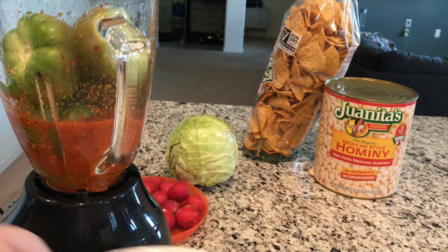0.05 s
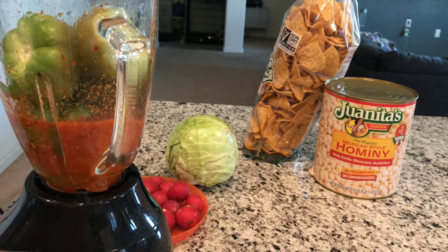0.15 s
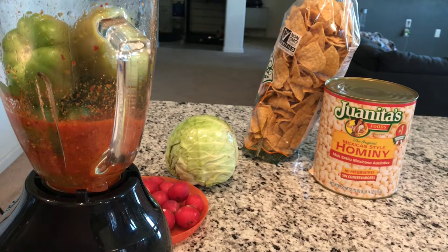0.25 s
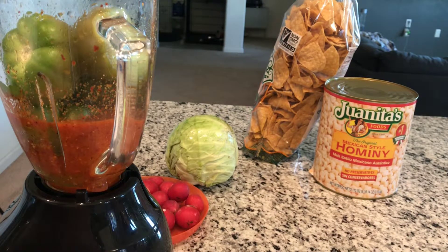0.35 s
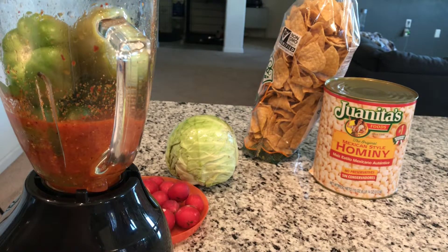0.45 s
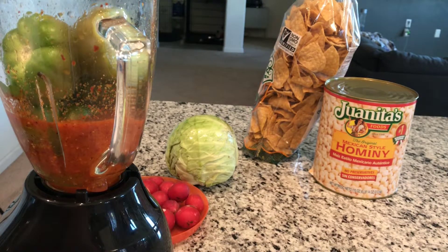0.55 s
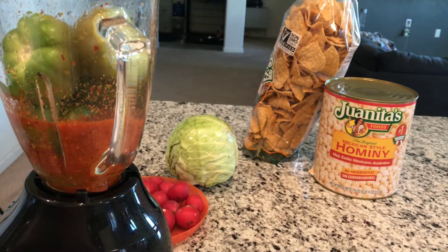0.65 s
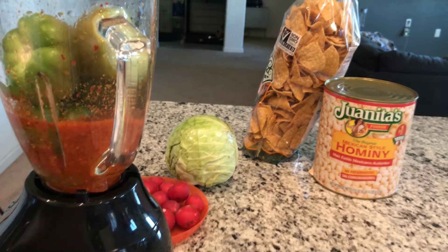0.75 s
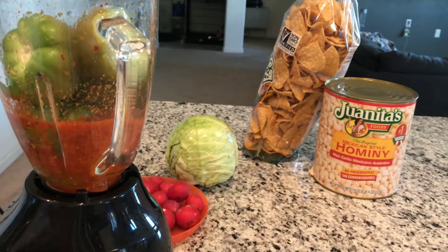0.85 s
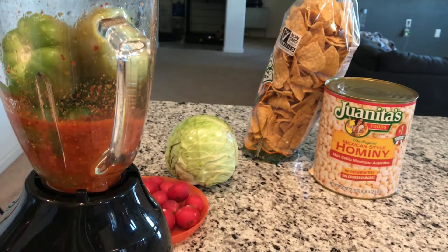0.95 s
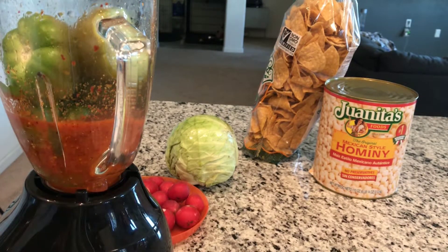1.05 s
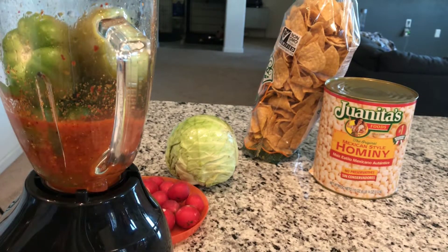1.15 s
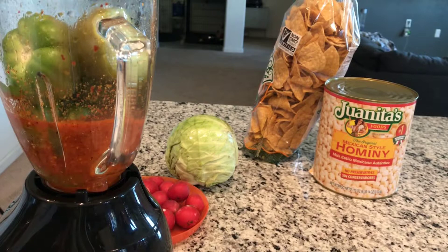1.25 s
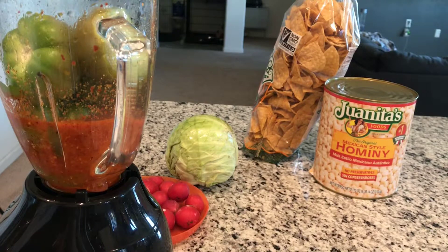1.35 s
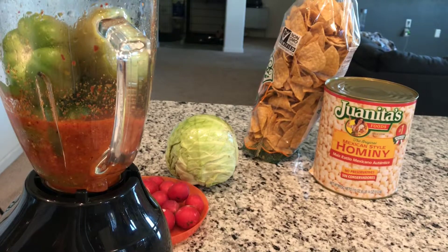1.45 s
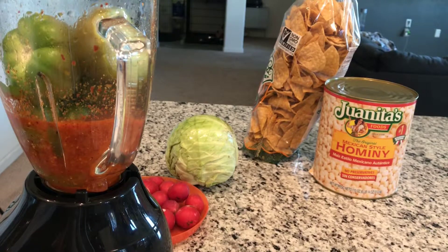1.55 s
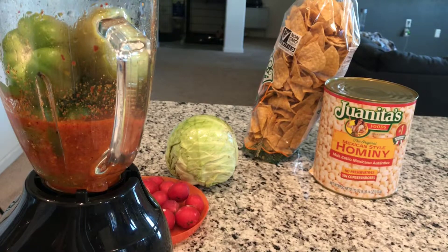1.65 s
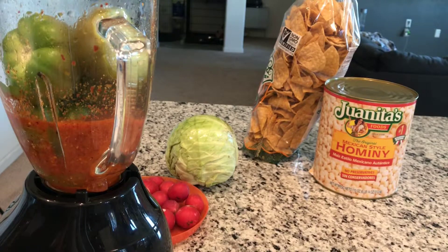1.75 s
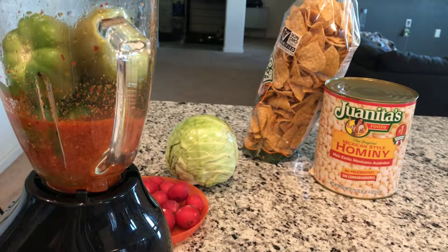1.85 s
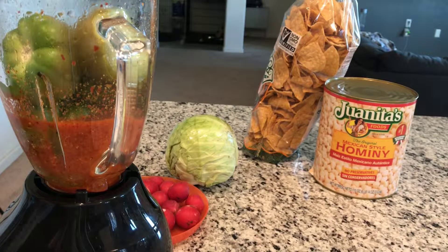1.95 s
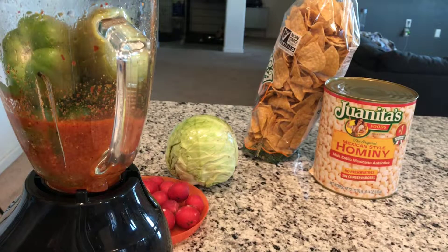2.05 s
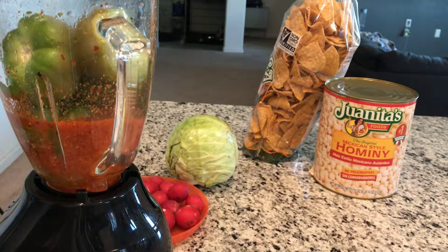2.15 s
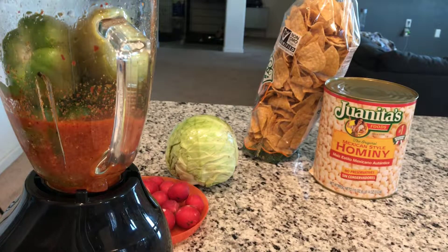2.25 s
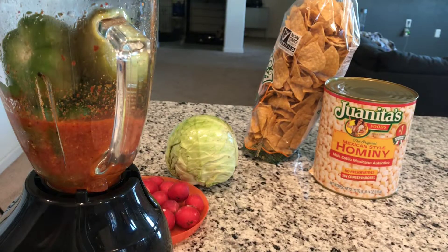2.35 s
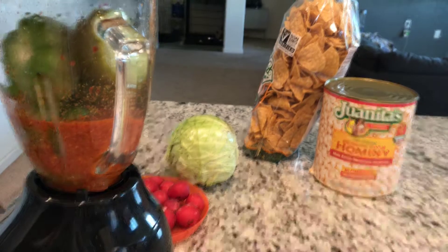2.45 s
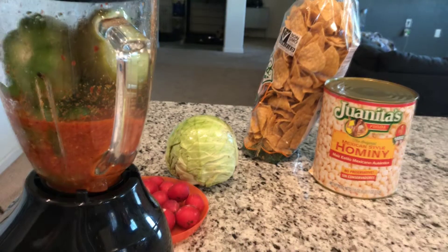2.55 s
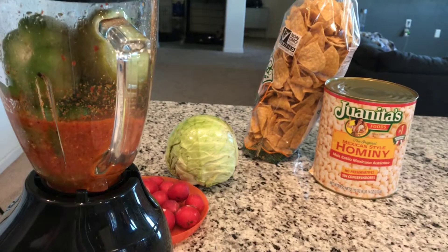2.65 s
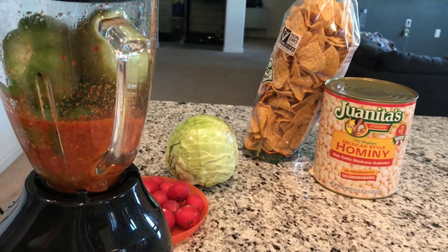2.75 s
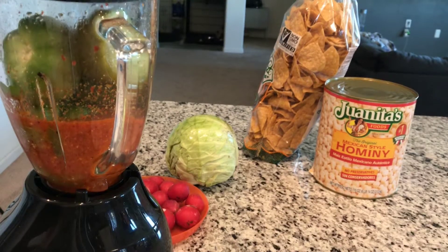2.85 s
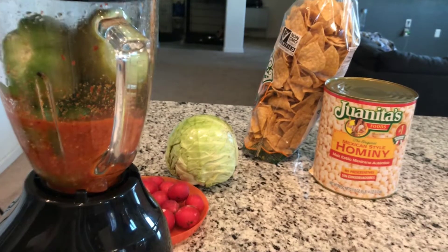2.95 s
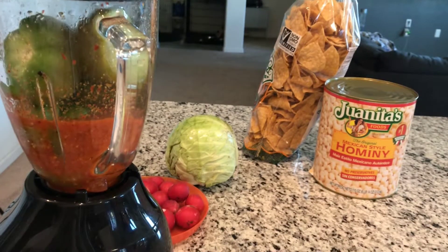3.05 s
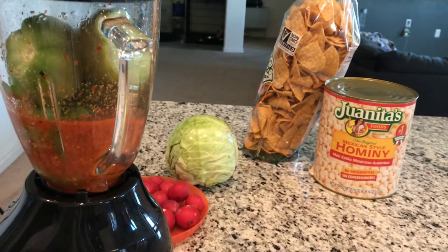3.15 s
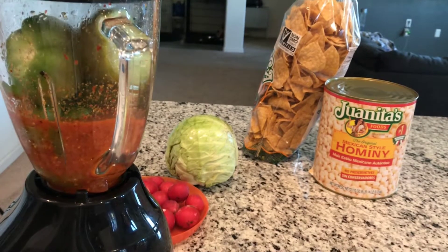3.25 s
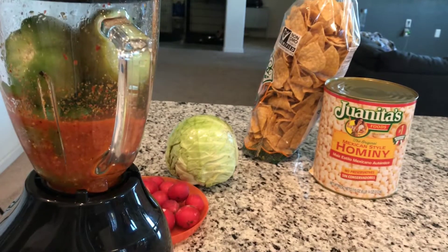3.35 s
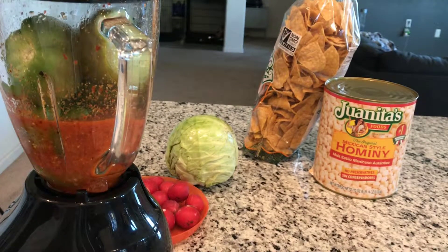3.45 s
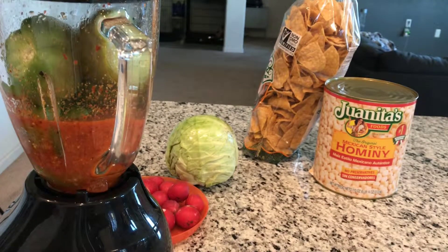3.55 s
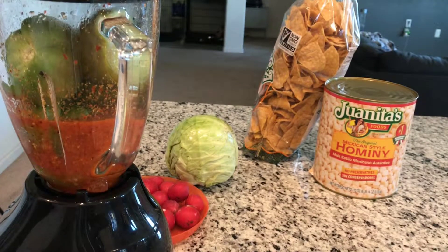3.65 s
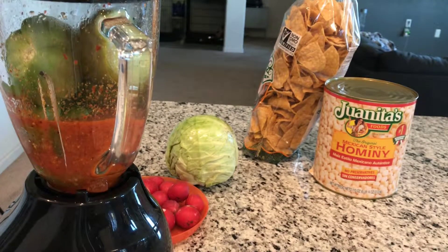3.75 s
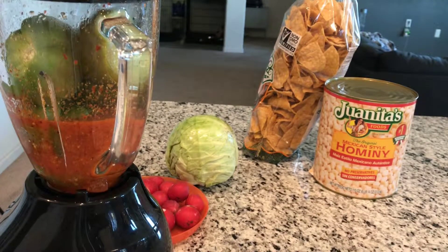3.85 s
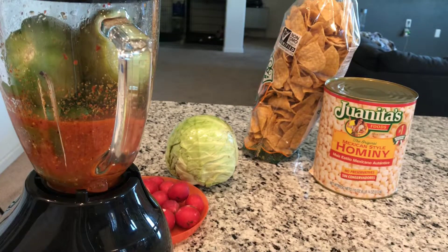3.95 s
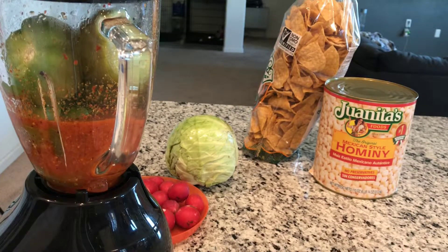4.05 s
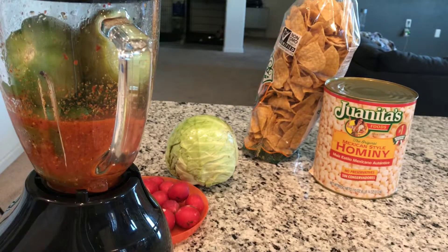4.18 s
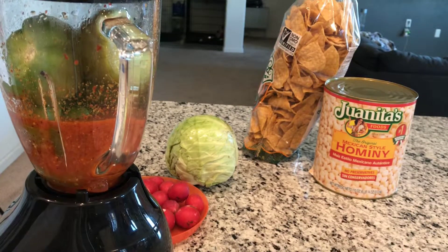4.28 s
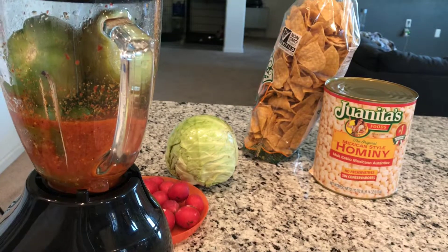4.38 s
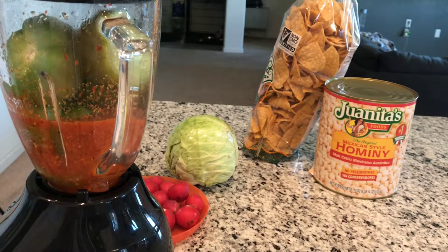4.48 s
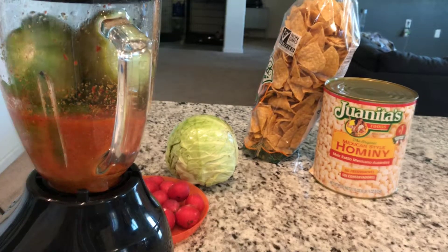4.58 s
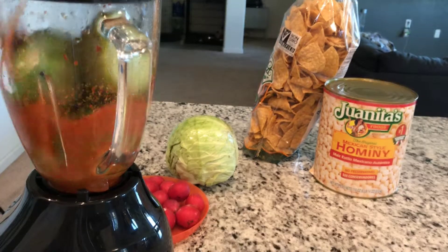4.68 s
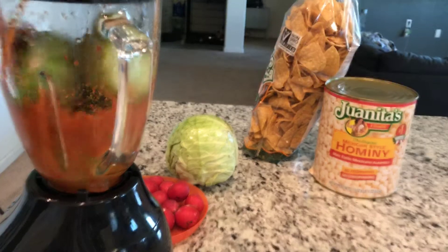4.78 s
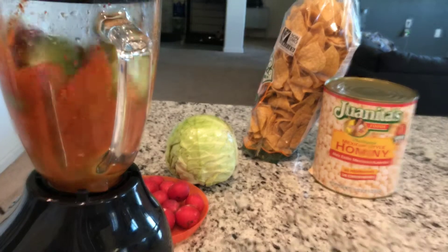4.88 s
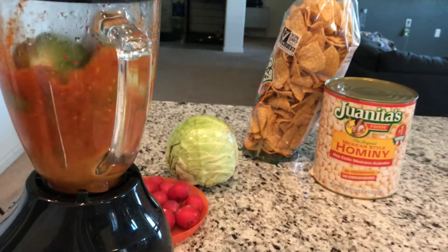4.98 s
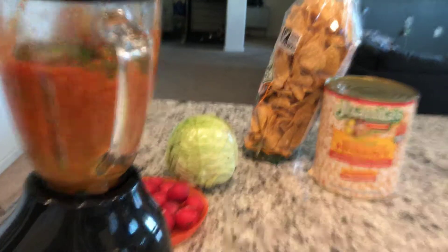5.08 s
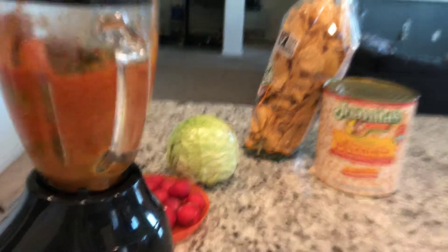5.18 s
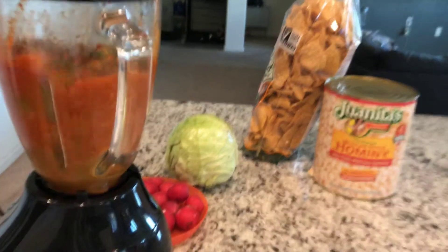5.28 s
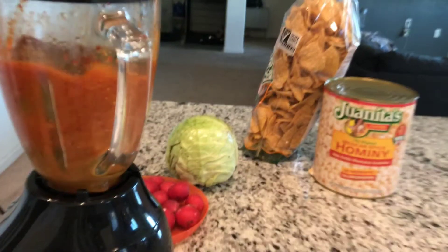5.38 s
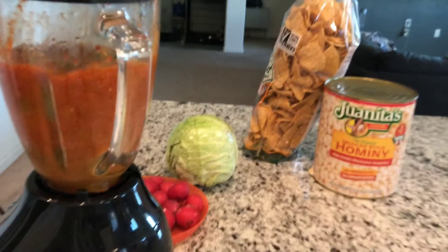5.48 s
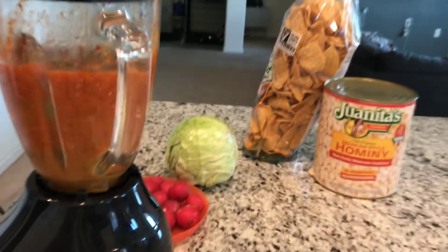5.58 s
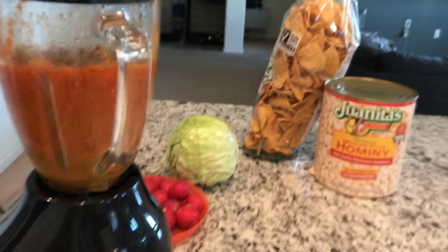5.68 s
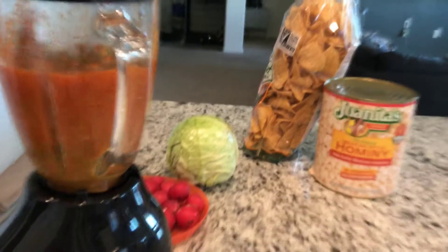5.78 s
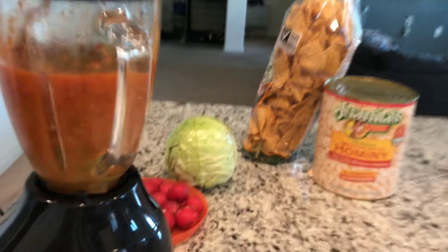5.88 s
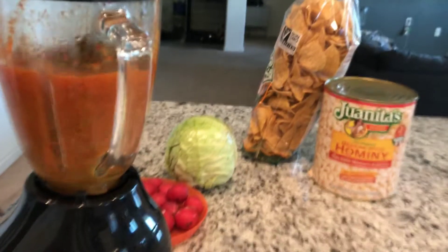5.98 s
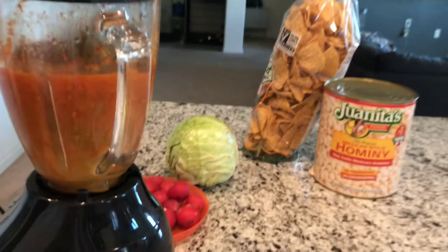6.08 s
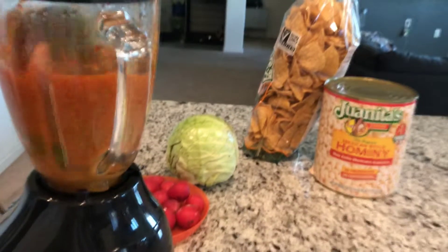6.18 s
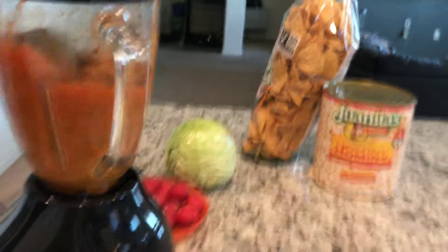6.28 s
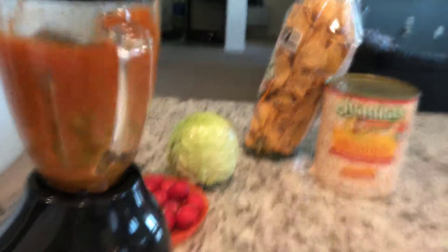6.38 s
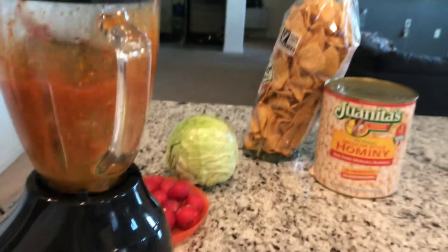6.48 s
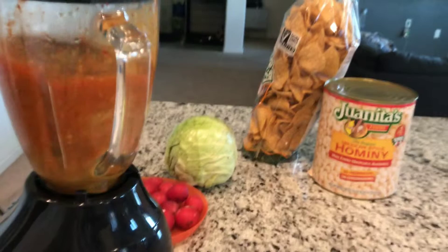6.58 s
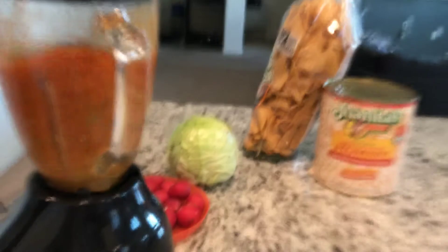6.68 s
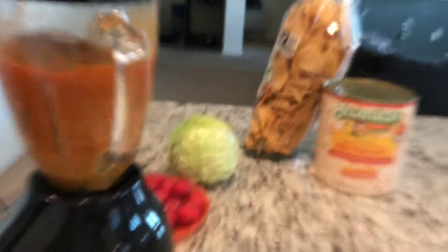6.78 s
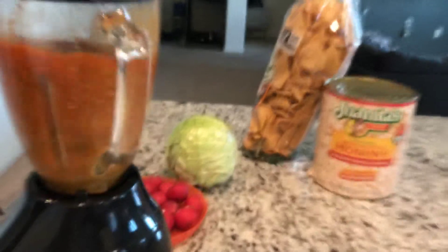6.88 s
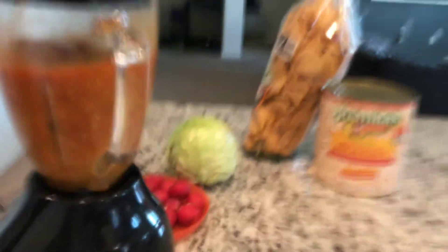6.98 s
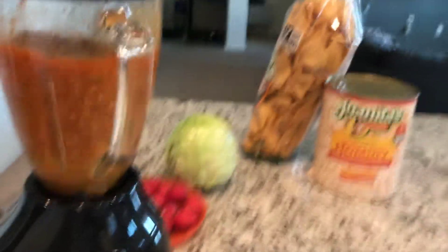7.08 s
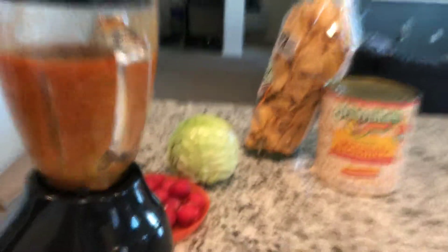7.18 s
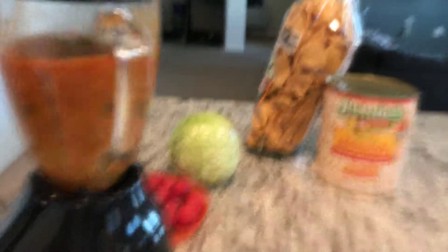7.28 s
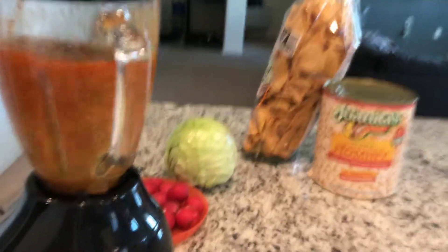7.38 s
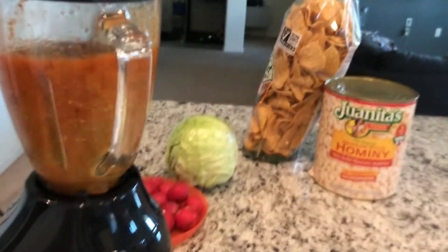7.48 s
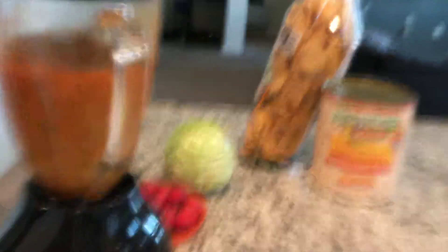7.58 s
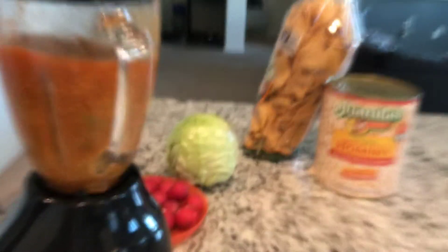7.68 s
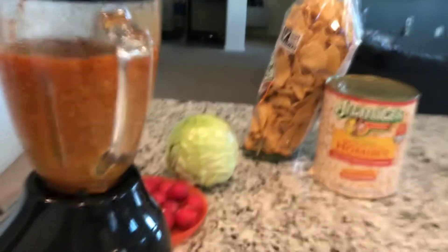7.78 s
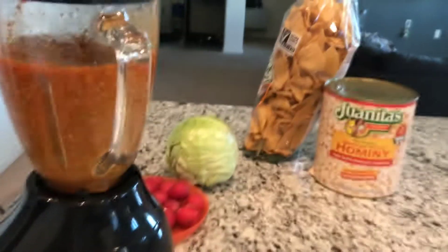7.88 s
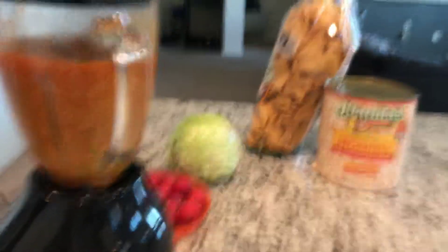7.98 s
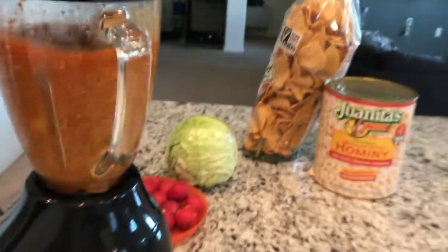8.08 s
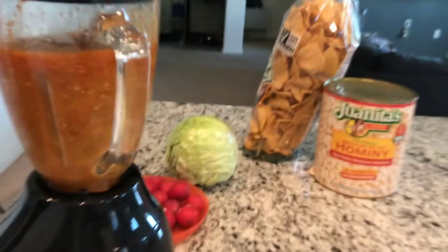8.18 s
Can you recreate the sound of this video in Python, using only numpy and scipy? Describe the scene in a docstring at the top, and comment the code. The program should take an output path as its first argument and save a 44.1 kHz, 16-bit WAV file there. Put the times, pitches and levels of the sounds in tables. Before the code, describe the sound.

In a small, lightly echoing home kitchen, a bowl and then a plate clatter onto a stone counter, a spoon scrapes and drops, and a lid is pressed on with a dull knock. Faint taps follow. A switch snaps and a blender growls into thick vegetables, loses its bite briefly, then speeds up into a wet, dense roar with pieces knocking the jar. The microphone is close by.

```python
"""A blender hums under a heavy load: its blades chop vegetables into sauce, slip briefly in an air pocket,
then gather speed as the mix thins and swirls up the jar. Dense random clicks and bubbles ring the jar.
Before that a bowl and a plate clatter on a stone kitchen counter, a spoon is put down, a lid is pressed on
and a switch snaps: short blows that ring each thing's resonances. A noise tail adds the kitchen's echo."""
import sys
import numpy as np
from scipy import signal
from scipy.fft import rfft, irfft, next_fast_len
from scipy.io import wavfile
from scipy.ndimage import uniform_filter1d

SR = 44100
rng = np.random.default_rng(int(sys.argv[2]) if len(sys.argv) > 2 else 0)


def inscribe(sig):
    """Save sig as 16-bit PCM at rate SR to the path in sys.argv[1].

    A 1-D sig is mono; a 2-D sig holds one channel per row.
    Samples are clipped to [-1, 1] before scaling.
    """
    pcm = np.round(np.clip(np.atleast_2d(sig).T, -1, 1) * 32767)
    wavfile.write(sys.argv[1], SR, pcm.astype(np.int16))


N = 362943
TIME = np.arange(N) / SR


def from_db(db):
    """Turn decibels into gain."""
    return 10 ** (np.asarray(db) / 20)


def rms_one(x):
    """Scale a sound to an average power of 1."""
    return x / np.sqrt(np.mean(x ** 2) + 1e-20)


def in_time(rows):
    """Draw each column of a table as a curve, sample by sample."""
    s, *columns = np.transpose(rows)
    return [np.interp(TIME, s, column) for column in columns]


def at_hz(points, hz):
    """Read a table between its points, along a log-frequency axis."""
    table_hz, values = np.array(points).T
    return np.interp(np.log(hz + 1), np.log(table_hz), values)


def add(out, s, sound):
    """Mix a short sound in at time s."""
    i = int(s * SR)
    out[i:i + len(sound)] += sound[:N - i]


def cut(x, hz, kind, order=2):
    """Keep one range of pitches with a Butterworth filter."""
    return signal.sosfilt(signal.butter(order, hz, kind, fs=SR, output="sos"), x)


def registers(x):
    """Split a sound into low, middle (sign flipped) and high parts."""
    thud_hz, crack_hz = 450, 3000
    return cut(x, thud_hz, "low"), -cut(x, [thud_hz, crack_hz], "band"), cut(x, crack_hz, "high")


def resonate(x, hz, width):
    """Ring one resonance with gain 1 at its peak; a narrower one rings longer."""
    r = np.exp(-np.pi * width / SR)
    feed = np.array([1, 0, -1]) * (1 - r * r) / 2
    feedback = [1, -2 * r * np.cos(2 * np.pi * hz / SR), r * r]
    return signal.lfilter(feed, feedback, x + 1e-18)


def colour(x, spectrum, peaks=()):
    """Shape a sound by a broad spectrum with resonances on it, without smearing it backward in time."""
    size = next_fast_len(len(x) + SR // 10) * 2
    hz = np.arange(size // 2 + 1) * SR / size
    db = at_hz(spectrum, hz) + sum(d / (1 + (2 * (hz - f) / w) ** 2) for f, w, d in peaks)
    # folding the cepstrum forward gives a minimum-phase filter
    cepstrum = irfft(np.log(from_db(db)))[:size // 2]
    cepstrum[1:] *= 2
    return irfft(rfft(x, size) * np.exp(rfft(cepstrum, size)))[:len(x)]


def drift(rate):
    """Wander randomly with a spread of 1, by straight lines between `rate` chance points per second."""
    knots = rng.standard_normal(N // 20)
    return np.interp(TIME * rate, np.arange(len(knots)), knots) * np.sqrt(3 / 2)


def grains(per_s, spread_db):
    """Scatter random clicks of uneven size and either sign."""
    sizes = from_db(spread_db * np.minimum(rng.exponential(1, N), 5)) * rng.choice([-1, 1], N)
    return rms_one(sizes * (rng.random(N) < per_s / SR))


def steady(x):
    """Even out slow swells, keeping the grain."""
    return x / np.sqrt(np.abs(uniform_filter1d(x ** 2, size=5000)) + 1e-12)


# how long the kitchen's echo takes to fall by 60 dB: f/Hz, fall time/s
ECHO_TIMES = [(100, 0.87), (300, 0.54), (1000, 0.49), (4500, 0.47), (14000, 0.44)]


def kitchen(x, wet_db, dull_hz):
    """Add the echo to the direct sound: a noise tail that dies away at its own pace in each band."""
    t, tail = TIME[:SR * 3 // 4], 0
    edges = np.geomspace(40, 18000, 10)
    for low, high in zip(edges, edges[1:]):
        t60 = at_hz(ECHO_TIMES, np.sqrt(low * high))
        band = cut(rng.standard_normal(len(t)), [low, high], "band")
        tail = tail + band * from_db(-60 * t / t60)
    build_up = 1 - np.exp(-t / 0.0017)
    tail = rms_one(tail * build_up) / np.sqrt(len(t))
    tail = cut(tail, dull_hz, "low", order=1)
    return x + from_db(wet_db) * signal.fftconvolve(x, tail)[:N]


def blows(hits, modes, contact_s, scatter_db, rattle_db, crack_db, bright_hz, gain_db):
    """Each blow rings the modes and gives a short crack; the hits set thud, body and crack levels."""
    rattle_s = 0.019   # how quickly a struck thing's rattling on its support dies away
    out, t = np.zeros(N), TIME[:SR // 4]
    for s, *levels_db in hits:
        # the contact is one click and a brief chatter, then loose parts rattle on
        contact = np.exp(-t / contact_s) / np.sqrt(contact_s * SR / 2)
        chatter, crack = rng.standard_normal((2, len(t))) * contact
        touches = rng.standard_normal(len(t)) * (rng.random(len(t)) < 700 / SR)
        rattle = from_db(rattle_db) * touches * np.exp(-t / rattle_s)
        force = (t == 0) + from_db(scatter_db) * chatter + rattle
        sound = from_db(crack_db) * cut(crack + rattle, bright_hz, "low", order=1)
        for k, (hz, width, db) in enumerate(modes):
            uneven_db = db + rng.normal(0, 0.65)   # no two blows ring quite alike
            sound = sound + (-1) ** k * from_db(uneven_db) * resonate(force, hz, width)
        for part, db in zip(registers(sound), levels_db):
            add(out, s, part * from_db(db + gain_db) / np.std(part[t < .014]))
    return out


def by_force(hits, thud_db, snap_db):
    """Spread each blow's level over thud, body and crack; a weaker blow is duller."""
    dulling = 0.53   # extra dB of crack lost for each dB that a blow is weaker
    hardest = max(db for s, db in hits)
    return [(s, db + thud_db, db, db + snap_db + dulling * (db - hardest)) for s, db in hits]


# colour of the quiet room: f/Hz, level/dB (per Hz, before scaling)
ROOM_TONE = [(18, -48), (30, -23), (53, -12), (174, -8.5), (449, -20.5), (616, -20.5), (1220, -24.5),
             (1390, -23.5), (16000, -37.5)]


def room_tone():
    """Steady background air: noise shaped by the room's colour."""
    return from_db(-69.5) * rms_one(colour(rng.standard_normal(N), ROOM_TONE))


# the bowl lands and bounces: t/s, level/dB (before gain)
BOWL_HITS = [(0.456, -24), (0.5285, -24), (0.5575, -27.5), (0.5745, -31.5), (0.587, -33.5)]
# what the bowl rings with: f/Hz, width/Hz, level/dB
BOWL_MODES = [(140, 25, -20), (269, 57, -15), (760, 130, -6), (874, 130, -4), (1323, 80, -9.5),
              (2230, 50, -7), (2372, 43, -0.5), (3830, 95, -19), (4620, 90, -9), (5950, 74, -19.5),
              (7050, 90, -18.5)]


def bowl():
    """The bowl lands on the stone and bounces, ringing its resonances."""
    return blows(by_force(BOWL_HITS, thud_db=-10, snap_db=-7.5), BOWL_MODES, contact_s=0.0031,
                 scatter_db=-14.5, rattle_db=-26.5, crack_db=-30.5, bright_hz=7000, gain_db=-1.5)


# the plate clatters down: t/s, level/dB (before gain)
PLATE_HITS = [(0.7285, -24), (0.7725, -24.5), (0.7815, -37), (0.804, -30), (0.8355, -25.5), (0.852, -40)]
# what the plate rings with: f/Hz, width/Hz, level/dB
PLATE_MODES = [(280, 51, -10.5), (704, 60, -2), (837, 270, -2), (943, 87, 3.5), (1128, 90, -7),
               (1552, 130, -6), (2210, 23, -7), (3590, 130, -12), (4000, 52, -10), (4690, 29, -11),
               (6000, 120, -18.5)]


def plate():
    """The plate clatters down, with a longer contact and more rattle than the bowl."""
    return blows(by_force(PLATE_HITS, thud_db=-9, snap_db=-4.5), PLATE_MODES, contact_s=0.0065,
                 scatter_db=-7.5, rattle_db=-11, crack_db=-20, bright_hz=9300, gain_db=-1.5)


# the spoon is nudged along before it is let go: t/s, peak level/dB (before gain)
SCRAPES = [(1.212, -52.5), (1.234, -39), (1.251, -41), (1.297, -52), (1.323, -49.5), (1.391, -44),
           (1.466, -55.5), (1.502, -45)]
# what the spoon rings with, sliding or dropped: f/Hz, width/Hz, level/dB
SPOON_MODES = [(80, 50, -6), (230, 68, -13.5), (1130, 230, -3.5), (1335, 81, 2.5), (1580, 310, -6.5),
               (2180, 194, -4), (2800, 180, -17), (4330, 600, -17), (6940, 150, -18)]


def spoon_slide(per_s, dull_hz, gain_db):
    """Tiny slips of friction ring the spoon's modes; each nudge swells quickly and dies away."""
    attack_s, release_s = 0.0045, 0.01
    slips = cut(grains(per_s, spread_db=1.8), dull_hz, "low", order=1)
    rub, push = 0, 0
    for k, (hz, width, db) in enumerate(SPOON_MODES):
        rub = rub + (-1) ** k * from_db(db) * resonate(slips, hz, width)
    for s, db in SCRAPES:
        fade = np.maximum((s - TIME) / attack_s, (TIME - s) / release_s).clip(0, 20)
        push = push + from_db(db) * np.exp(-fade)
    return from_db(gain_db) * push * rms_one(rub)


# the spoon drops and bounces once: t/s, level/dB (before gain)
SPOON_HITS = [(1.513, -24), (1.546, -33.5)]


def spoon_drop():
    """The spoon drops and bounces, with a very short, bright contact."""
    return blows(by_force(SPOON_HITS, thud_db=-21.5, snap_db=-6), SPOON_MODES, contact_s=0.0011,
                 scatter_db=-4.5, rattle_db=-16, crack_db=-25.5, bright_hz=11000, gain_db=-3.5)


# the lid is pressed on: t/s, level/dB (before gain)
LID_HITS = [(2.4555, -28), (2.49, -43)]
# what the lid rings with: f/Hz, width/Hz, level/dB
LID_MODES = [(68, 24, -3), (137, 92, -11), (320, 72, -7), (610, 47, 4.5), (690, 140, -4.5),
             (1300, 140, -17.5), (2380, 1800, -15)]


def lid():
    """The lid is pressed on: a dull knock with more chatter than click."""
    return blows(by_force(LID_HITS, thud_db=-4, snap_db=-11.5), LID_MODES, contact_s=0.0045,
                 scatter_db=4.0, rattle_db=-17, crack_db=-18.5, bright_hz=2940, gain_db=-3.0)


# the jar snaps into its seat: t/s, level/dB (before gain)
JAR_SNAPS = [(2.529, -43), (2.539, -44), (2.569, -36)]
# a hand bumps and taps the motor base: t/s, tap level/dB, thud level/dB (before gain)
BASE_HITS = [(2.924, -52, -40), (2.938, -62, -44.5), (3.0375, -45, -54), (3.2429, -46, -51.5),
             (3.71, -61, -78), (3.865, -58, -73), (3.879, -44.5, -75), (3.888, -45.5, -74),
             (3.988, -61.5, -80), (4.12, -47, -81), (4.257, -60, -62), (4.457, -57, -76),
             (4.471, -46.5, -64), (4.517, -67, -51)]
# what the motor base rings with: f/Hz, width/Hz, level/dB
BASE_MODES = [(118, 47, -1), (280, 47, -2.5), (1164, 330, -17.5), (2270, 1100, -18), (3970, 2100, -21.5)]


def motor_base():
    """The jar snaps into its seat and a hand taps the base; both ring the base's resonances."""
    fingertip_crack_db = -18   # a fingertip is soft: its crack lies this far under the tap
    snaps = by_force(JAR_SNAPS, thud_db=-2, snap_db=3.5)
    taps = [(s, thud_db, db, db + fingertip_crack_db) for s, db, thud_db in BASE_HITS]
    return blows(snaps + taps, BASE_MODES, contact_s=0.0035,
                 scatter_db=4.5, rattle_db=-16.5, crack_db=-17, bright_hz=4000, gain_db=-3)


# the switch snaps on: t/s, level/dB (before gain)
SWITCH_HITS = [(4.6015, -25.5)]
# what the switch rings with: f/Hz, width/Hz, level/dB
SWITCH_MODES = [(303, 38, 7), (1050, 65, 5.5), (2030, 280, -4.5), (3120, 360, -5.5), (3620, 270, -2.5),
                (6300, 290, -10)]


def switch():
    """The switch snaps: one blow of strong chatter with hardly any rattle."""
    return blows(by_force(SWITCH_HITS, thud_db=-8.5, snap_db=1.8), SWITCH_MODES, contact_s=0.0032,
                 scatter_db=8, rattle_db=-40, crack_db=-10.0, bright_hz=9100, gain_db=-3.5)


MOTOR_ON_S = 4.605
# the parts of the motor's hum: multiple of the hum's pitch, level/dB (before the strain level)
HUM = [(1, 1.5), (2, -19), (3, -8), (4, -35)]


def motor_hum():
    """The motor's torque pulses at twice the mains frequency; pitch and strength waver a little."""
    hum_hz = 121.6
    start_db, eased_db, ease_s = -43.5, -54.5, 1.77
    phase = 2 * np.pi * np.cumsum(hum_hz * (1 + 0.0035 * drift(11))) / SR
    hum = sum(from_db(db + 2 * drift(8.5)) * np.sin(round(k) * phase) for k, db in HUM)
    # the motor strains less once the big pieces are cut
    strain_db = np.interp(TIME - MOTOR_ON_S, [0, ease_s], [start_db, eased_db])
    return from_db(strain_db) * hum


def bubbles(per_s, spread_db, sharpness):
    """Bubbles of many sizes collapse, each ringing for a few cycles; even in power per Hz."""
    total = 0
    for hz in np.geomspace(300, 12000, 16):
        collapses = grains(per_s * np.sqrt(hz / 1000), spread_db)
        total = total + resonate(collapses, hz, hz / sharpness)
    return rms_one(total)


# how hard the blades bite into the mix, as a churning level: t/s, level/dB (before scaling)
BITE = [(4.63, -45), (4.69, -48), (4.74, -35), (4.83, -31), (4.92, -35), (5.0, -31.5), (5.07, -30.5),
        (5.2, -45.5), (5.73, -43), (5.76, -37), (5.83, -46), (5.93, -47), (5.98, -39), (6.15, -34.5),
        (6.23, -42), (6.35, -32), (6.38, -38), (6.53, -32.5), (6.81, -32.5), (6.94, -45.5), (7.15, -31),
        (7.29, -32.5), (7.37, -30), (8.15, -32), (8.17, -27), (8.23, -29.5)]
# the shaft spins up, is dragged down, then gains as the mix thins: t/s, speed/(turns per s)
SPEED = [(4.6, 8.4), (4.75, 66), (5.2, 49), (6.35, 51.8), (6.7, 66), (7.15, 70), (7.35, 88), (8.23, 94)]
# the thinning sauce: t/s, vortex resonance level/dB, fine fizz level/dB
SLURRY = [(5.1, -5, 3), (5.5, 0.5, 9), (6.1, 1.5, -19), (6.6, 2.5, -0.5), (7.9, 5.5, 3), (8.2, 12, 3.5)]
# broad colour of the full jar on its base: f/Hz, level/dB
JAR = [(30, -25), (60, -1.5), (90, 1.5), (170, -6), (400, -15.5), (520, -18.5), (750, -12.5), (1500, -13.5),
       (2500, -11), (3000, -18.5), (5000, -16.5), (9500, -25.5), (15500, -25)]
# the jar's resonances on top of that colour: f/Hz, width/Hz, level/dB
JAR_MODES = [(208, 49, 2.8), (299, 123, 10.7), (880, 100, 3.4), (970, 51, 2.4), (1208, 357, 11.6),
             (1660, 150, 5.8), (1768, 56, 4.5), (1982, 186, 8.0), (2398, 170, 6.8), (3492, 134, 10.1),
             (4047, 460, 7.9), (5666, 500, 9.8), (7300, 970, 4.5), (11340, 79, 7.1)]


def blades(rumble_db, churn_db, spray_db, surge_db):
    """Blades beat the mix: impacts and collapsing bubbles ring the jar, in step with the shaft."""
    full_bite_db = -31   # the blades are fully covered
    bite = in_time(BITE)[0] - full_bite_db
    speed, = in_time(SPEED)
    vortex_db, fizz_db = in_time(SLURRY)
    turns = np.cumsum(speed * (1 + .02 * drift(20))) / SR

    # two blades pass each turn, and the load surges as pieces fall in
    load = (1 + 0.19 * np.cos(4 * np.pi * turns)) * from_db(surge_db * drift(60))
    chopping = grains(1800, spread_db=3.2) + bubbles(per_s=260, spread_db=3.6, sharpness=4)
    impacts = rms_one(load * (chopping + 0.48 * rng.standard_normal(N)))

    # once a turn a blade tip catches a piece and throws a burst of spray
    since_catch_s = (turns % 1) / speed
    catch = rms_one(np.exp(-since_catch_s / .002) * from_db(4 * drift(50)))
    bursts = cut(catch * rng.standard_normal(N), 6500, "low")
    # these bursts take a larger share as the blades lose their bite
    share = np.clip(0.32 - 0.43 * bite, 0, 1)
    droplets = impacts * (1 - share) + share * (.8 * bursts + .6 * rng.standard_normal(N))

    wall = kitchen(colour(impacts, JAR, JAR_MODES), wet_db=-9, dull_hz=9000)
    splash = kitchen(colour(droplets, JAR, JAR_MODES), wet_db=-9, dull_hz=9000)
    rumble, churn, _ = registers(wall)
    spray = registers(splash)[2]

    # the hollow of the vortex rings, and thinner sauce fizzes higher
    churn = churn + (from_db(vortex_db) - 1) * resonate(churn, hz=1270, width=280)
    fizz = spray - cut(spray, 8500, "low", order=1)
    spray = spray + (from_db(fizz_db) - 1) * fizz

    # churn and spray follow the bite; the rumble mostly follows the shaft (4 dB per doubling)
    loaded_turns_per_s = 55.4
    rumble_swing = 0.16 * bite + 4 * np.log2(speed / loaded_turns_per_s)
    mix = from_db(rumble_db + rumble_swing) * steady(rumble)
    mix = mix + from_db(churn_db + bite) * steady(churn)
    return mix + from_db(spray_db + 0.99 * bite) * steady(spray)


def blender():
    """The beaten mix and the motor's hum, both fading in within 15 ms of switching on."""
    running = np.clip((TIME - MOTOR_ON_S) / 0.015, 0, 1)
    mix = blades(rumble_db=-41.5, churn_db=-32.5, spray_db=-36, surge_db=2.0)
    return running * (mix + motor_hum())


# hard pieces flung against the jar: t/s, peak level/dB (before gain), ring f/Hz
CHUNKS = [(4.991, -22.5, 1930), (5.031, -23, 1300), (6.006, -27.5, 2000), (6.179, -22.5, 4000),
          (6.344, -25, 4120), (7.757, -21, 1895), (7.823, -28, 1260), (7.946, -26.5, 1130),
          (8.1633, -18, 1370), (8.181, -19, 1300), (8.189, -19, 3800)]


def flung_pieces(gain_db, width_hz, jar_share):
    """A hard piece knocks on the jar and stirs one resonance most."""
    out, t = np.zeros(N), TIME[:SR // 20]
    for s, db, hz in CHUNKS:
        knock = colour(rng.standard_normal(len(t)) * np.exp(-t / 0.00049), JAR, JAR_MODES)
        knock = jar_share * rms_one(knock) + rms_one(resonate(knock, hz, width_hz))
        add(out, s, from_db(db + gain_db) * knock / np.abs(knock).max())
    return out


def scene():
    """Things are handled on the counter, then the blender runs."""
    spoon = spoon_slide(per_s=2100, dull_hz=1700, gain_db=-1.5) + spoon_drop()
    pieces = flung_pieces(gain_db=5.5, width_hz=390, jar_share=0.52)
    near = kitchen(bowl() + switch() + pieces, wet_db=-10, dull_hz=9000)
    near = near + kitchen(motor_base() + lid(), wet_db=-11.5, dull_hz=7150)
    far = kitchen(plate(), wet_db=-9.5, dull_hz=9900) + kitchen(spoon, wet_db=-11.0, dull_hz=6000)
    return (room_tone() + near + far + blender())[None]


def record(dry):
    """The microphone loses the deepest bass; the top is cut steeply."""
    dry = cut(dry, 38, "high")
    return signal.sosfilt(signal.ellip(10, .1, 80, 15900, fs=SR, output="sos"), dry)


dry = scene()
out = record(dry)
inscribe(out)
```